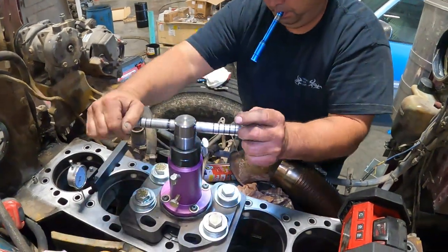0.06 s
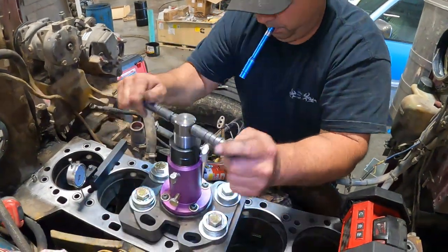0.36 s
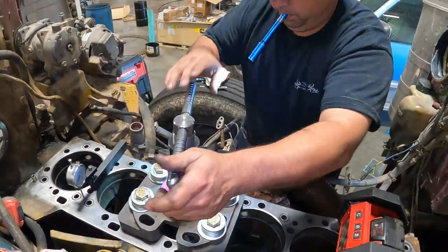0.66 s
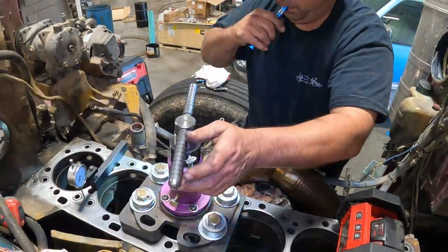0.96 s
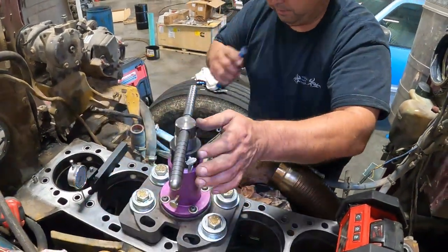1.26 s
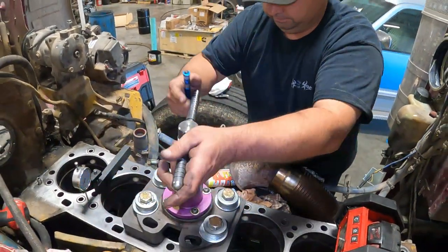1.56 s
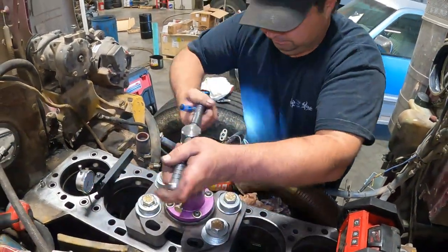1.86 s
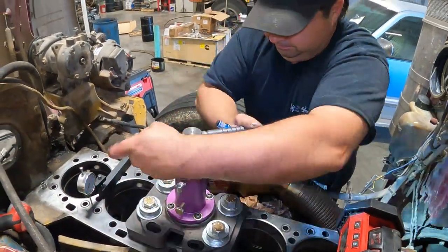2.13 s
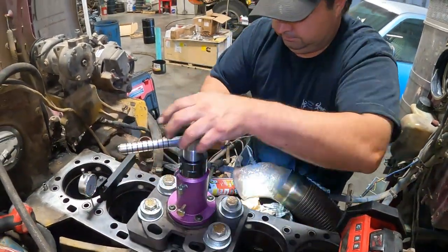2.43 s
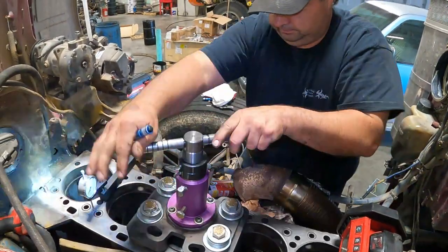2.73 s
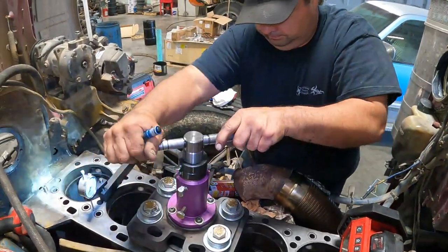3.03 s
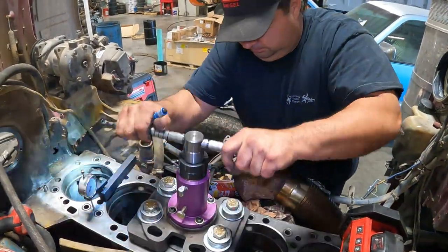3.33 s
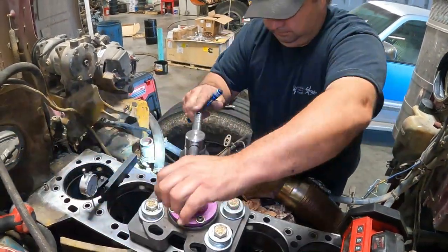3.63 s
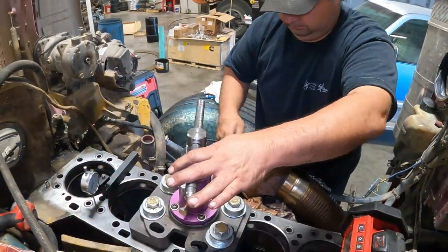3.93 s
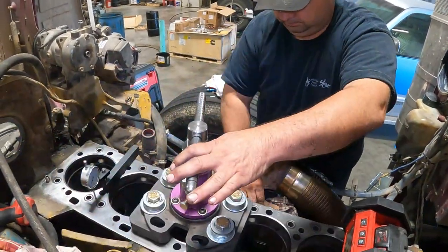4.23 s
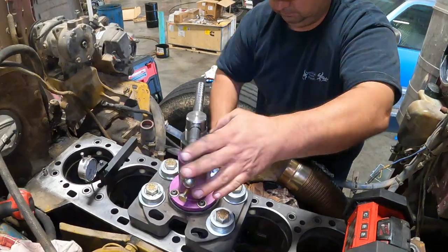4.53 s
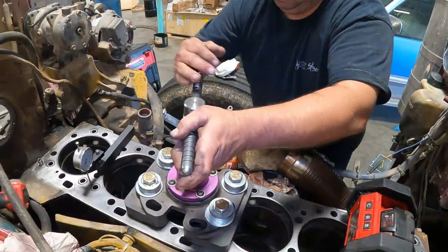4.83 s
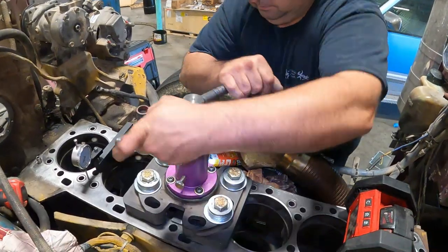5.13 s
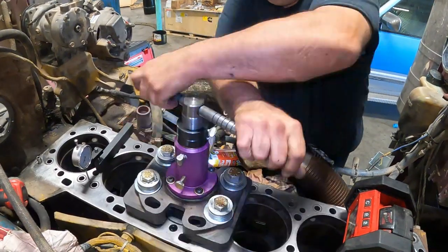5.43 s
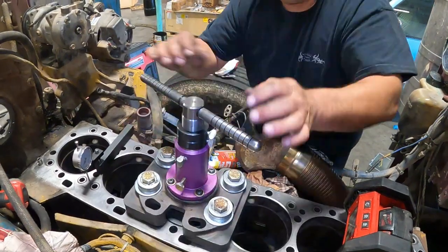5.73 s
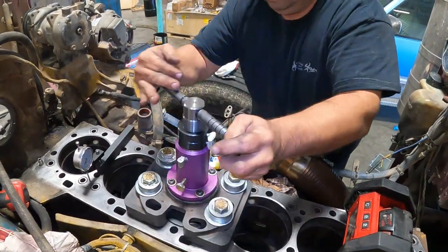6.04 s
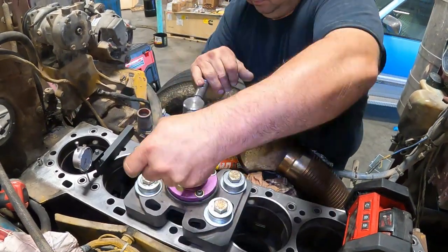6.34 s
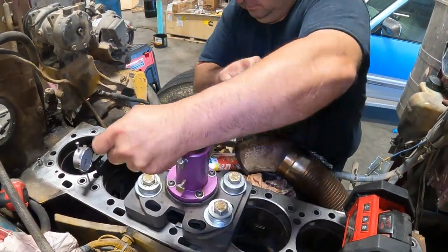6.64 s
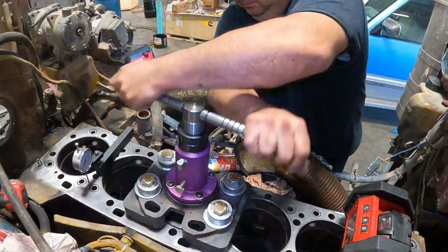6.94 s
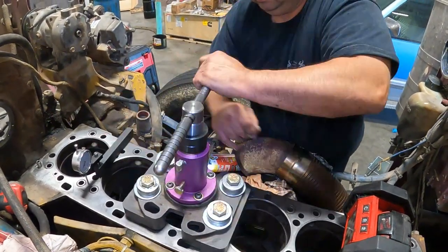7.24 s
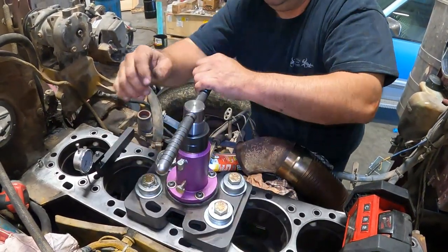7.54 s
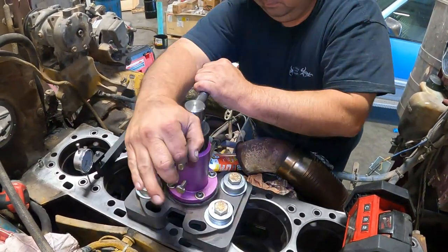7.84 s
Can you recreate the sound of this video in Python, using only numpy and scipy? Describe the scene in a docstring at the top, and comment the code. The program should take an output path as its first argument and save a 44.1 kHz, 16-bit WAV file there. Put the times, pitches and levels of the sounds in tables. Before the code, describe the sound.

In a workshop, a cutter turned by hand scrapes inside an iron engine block, each short stroke a gritty, ringing rasp. Between the first four strokes the tool knocks, hands bump and the sliding steel handle clacks sharply. Three more strokes follow close together, then a few last knocks. The microphone is close, picking up small ticks and rustling clothes over a distant machine's low hum.

```python
"""A workshop, a phone microphone close to an iron engine block. Over the low hum of a distant machine,
clothes rustle and something small ticks. A counterbore cutter is turned by hand: its blade crumbles
a chip and the block rings with a rasp. Between the first four strokes the tool knocks, hands bump
and the sliding T-handle clacks, steel on steel. From about 6 s three more strokes come close
together, and a few last knocks leave the hum on its own."""
import sys
import numpy as np
from scipy import signal
from scipy.fft import rfft, irfft, next_fast_len
from scipy.io import wavfile
from scipy.ndimage import map_coordinates

SR = 44100
rng = np.random.default_rng(int(sys.argv[2]) if len(sys.argv) > 2 else 0)


def waveform_to_disk(signal):
    """Save audio, clipped to [-1, 1], as 16-bit WAV at the path in sys.argv[1]."""
    frames = np.transpose(np.atleast_2d(signal))
    scaled = np.clip(frames, -1, 1) * 32767
    samples = np.round(scaled).astype(np.int16)
    wavfile.write(sys.argv[1], SR, samples)


N = 352359

# Levels in the tables are relative; each source sets its own trim.
# room tone of the shop: freq_hz, level_db
AIR_SPECTRUM = [(15, -43), (25, -18), (48, -19.5), (82, -11), (122, -5), (164, -9.5), (213, -5),
                (278, -6.5), (382, -6.5), (599, -11), (991, -19), (1070, -13.5), (14000, -43)]
# hum of the distant machine: time_s, pitch_hz
MACHINE_PITCH = [(0.0, 53.88), (0.87, 54.83), (1.02, 57.1), (4.12, 66.62), (7.28, 62.72), (7.56, 62.1),
                 (7.99, 54.0)]
# its loudness: time_s, level_db
MACHINE_LEVEL = [(0.06, -60), (0.46, -64.5), (0.5, -77), (0.72, -54.5), (1.08, -66), (1.19, -58.5),
                 (2.62, -64), (2.75, -80.5), (3.13, -51.5), (3.24, -55.5), (4.23, -52), (4.79, -63.5),
                 (5.25, -55.5), (6.16, -72.5), (6.22, -57), (7.3, -57.5), (7.41, -68), (7.99, -74.5)]
# sleeves and palms moving: start_s, length_s, rub_db, swish_db
SLEEVE_MOVES = [(-0.04, 0.54, -51, -59.5), (1.03, 0.674, -55, -66.5), (1.58, 0.485, -47, -48.5),
                (2.26, 0.35, -48, -48), (2.56, 0.32, -57.5, -57.5), (2.93, 0.258, -54.5, -46),
                (3.66, 0.82, -47, -57), (4.3, 0.344, -47, -49.5), (4.6, 0.375, -53.5, -61),
                (4.84, 0.524, -45, -48)]
# low rub of cloth: freq_hz, level_db
RUB_SPECTRUM = [(40, -38.5), (90, -5), (150, -5), (270, -4.5), (380, 2.5), (480, -6), (800, -7),
                (1500, -13), (3000, -14.5), (8000, -70)]
# bright swish of cloth: freq_hz, level_db
SWISH_SPECTRUM = [(500, -31.5), (1400, -3), (2200, -3), (3200, 4), (3800, 0.5), (4600, -1.5), (7000, -15.5),
                  (10000, -27), (14000, -23.5)]
# a hand sliding: start_s, rise_s, level_db, t60_s
HAND_SCUFFS = [(2.306, 0.025, -48, 1.13), (4.305, 0.0632, -31.5, .41)]
# colour of that scuff: freq_hz, level_db
SCUFF_SPECTRUM = [(100, -7.5), (600, -0.5), (2200, -4.5), (4500, -3), (7000, -13), (10000, -12.5),
                  (14000, -33)]
# small dry ticks: start_s, level_db, rebound_count
DRY_TICKS = [(0.032, -34.5, 1), (0.0722, -39, 0), (0.1305, -32.5, 0), (0.1883, -33.5, 0), (0.2474, -33, 0),
             (0.311, -32.5, 0), (0.3783, -31, 0), (0.4664, -37.5, 0), (1.272, -31, 0), (1.4299, -30.5, 0),
             (1.485, -32, 0), (1.5381, -32, 0), (1.5954, -30.5, 0), (1.8043, -31, 1), (2.7644, -32.5, 1),
             (3.9965, -32.5, 1), (4.0312, -32, 2), (4.0771, -32.5, 1), (4.142, -32.5, 2), (4.228, -32.5, 1),
             (6.765, -33, 0)]
# colour of a tick: freq_hz, level_db
TICK_SPECTRUM = [(300, -16), (1000, 7), (2500, -3.5), (5000, 2), (8000, -13), (11000, -11.5),
                 (15000, -20.5)]
# strokes of the cutter: start_s, attack_s, hold_s, release_s, bite_db, end_db (level as the hold
# begins and ends), judder_db, end_judder_db (likewise), hollow_db, hiss_db, stall_db (extra judder)
CUTTER_STROKES = [ (0.261, 0.06625, 0.2547, 0.113, -39, -21, -6.5, -17.5, -1, -9.5, 20.5),
                  (1.982, 0.0258, 0.2033, 0.0692, -32, -30, -13.5, -9, -2, -9, 4),
                  (3.287, 0.0795, 0.2326, 0.0892, -29.5, -22.5, -4, -4, -1.5, -8, 2),
                  (5.1, 0.0228, 0.4224, 0.0603, -28.5, -28, -5, -11.5, 0, -8, 2.5),
                  (6.113, 0.0398, 0.1426, 0.055, -33, -26, -11, -8, -4, -9.5, 13),
                  (6.572, 0.0308, 0.07155, 0.0545, -35.5, -29.5, -10.5, -4.5, 1.5, -8, 6.5),
                  (6.747, 0.0609, 0.475, 0.0708, -30, -34.5, -6, -4, -2, -7.5, 3.5), ]
# borders of the block's five bands (thud, judder, hollow ring, bite, hiss): freq_hz
BAND_EDGES_HZ = [520, 950, 1750, 3600]
# how each band grows with blade speed: exponent
SPEED_EXPONENTS = [0.6, 0.802, 1.1, 1.4, 2.0]
# how each band grows with the push: slope_db_per_db
PUSH_SLOPES = [0.349, 0.6, 0.85, 1.0, 1.22]
# the crumbling chip: freq_hz, level_db
CHIP_SPECTRUM = [(130, -22.5), (280, -26), (450, -19), (1100, -14.5), (2400, -12), (3800, -15), (5500, -26),
                 (7500, -32.5), (10000, -39), (14000, -55)]
# resonances of the block and clamped tool: pitch_hz, width_hz (45 at least is used), lift_db
BLOCK_MODES = [(383.6, 80, 19), (531, 76, 7.5), (647, 31, 13.5), (768.6, 52, 13.5), (839, 8.3, 14.5),
               (988, 23, 5.5), (1081.1, 27, 12), (1260, 56, 11.5), (1357.8, 41, 16.5), (1485, 20, 10.5),
               (1676, 26, 6.5), (1720, 49, 0), (1880.7, 48, 8.5), (2221, 163.6, 17), (2424, 63, 14),
               (2520.4, 35, 9.5), (2640, 66, 3.5), (2752.4, 49, 12.5), (3000, 22, 0.5), (3179, 164, 8),
               (3480, 60, 5.5), (3718, 100, 7.5), (4355, 18, -11), (5763, 150, 3), (6290, 217, -1.5),
               (7280, 196, -20)]
# the tool takes up its slack: start_s, level_db, low_db, high_db, t60_s
TOOL_KNOCKS = [(1.098, -48, 11, -24.5, 0.08), (1.118, -41.5, -0.5, -15, 0.05),
               (1.579, -30.5, -13.5, -2.5, 0.0545), (3.842, -41, 2, -28.5, 0.054),
               (3.878, -27.5, 1, -6, 0.0687), (4.406, -28, -7.5, -18.5, 0.062),
               (6.022, -17.5, -9, -9, 0.0894), (6.429, -19, -18, -24.5, 0.00545),
               (7.218, -22, 2.5, -13, 0.11), (7.691, -28, 0.5, -9, 0.097), (7.703, -36.5, 7, -19.5, 0.166)]
# dull bumps of hands and arms: start_s, level_db, pitch_hz, t60_s
HAND_BUMPS = [(1.169, -48, 142.4, 0.67), (1.36, -48, 150.5, 0.505), (2.236, -39, 221.4, 0.178),
              (2.275, -38.5, 153.9, 0.212), (2.373, -23.5, 173, 0.041), (2.438, -49.5, 157.5, 0.68),
              (2.491, -33.5, 254.9, 0.28), (3.779, -34.5, 322.8, 0.081), (3.882, -27, 360.3, 0.0563),
              (3.965, -44, 145.6, 0.75), (4.691, -40.5, 196.7, 0.172), (4.881, -36.5, 189.4, 0.116),
              (6.024, -34.5, 308, 0.194), (7.217, -33.5, 147.3, 0.095), (7.697, -31, 336, 0.1)]
# clacks of the T-handle: start_s, level_db, knock_db (into the block), hardness_db (treble lift)
HANDLE_CLACKS = [(1.728, -7.5, -16.5, 0), (1.7834, -24.5, -9.5, -8), (2.8816, -11.5, -8.5, 3),
                 (2.8839, -7, -25.5, -13), (4.366, -11.5, -28.5, 17), (4.4479, -23.5, -14.5, 0.5)]
# resonances of the handle: pitch_hz, width_hz (280 at least is used), level_db
STEEL_MODES = [(2400, 440, -4), (3370, 250, -7.5), (3840, 170, 3), (4500, 250, 5), (4930, 300, 1.5),
               (5260, 350, -2.5), (6984, 530, -8)]
# steel striking steel: freq_hz, level_db
STRIKE_SPECTRUM = [(100, -19), (900, -7), (5500, -2), (6300, -4.5), (9000, -10.5), (14000, -16.5)]
# diffuse wake of a clack: freq_hz, level_db
WAKE_SPECTRUM = [(300, -8.5), (1400, -5), (2200, -13.5), (3300, 4), (4500, 3.5), (5800, -4.5), (7500, -19),
                 (12000, -36)]
# faint notes of rubbed steel: start_s, length_s, pitch_hz, width_hz, level_db
STEEL_WHISPERS = [(1.76, 0.188, 4160, 700, -58.5), (2.329, 0.336, 4453, 130, -60),
                  (2.32, 0.364, 6450, 1800, -65.5), (3.02, 0.1, 3150, 281, -49.5),
                  (3.294, 0.299, 5780, 70, -56), (4.073, 0.247, 657, 60.6, -53.5),
                  (4.093, 0.35, 3530, 600, -58.5), (4.846, 0.31, 2986, 489, -61.5)]
# decay of the hall: freq_hz, t60_s
HALL_DECAY = [(150, 0.6), (1000, 0.654), (4000, 0.707), (12000, 0.49)]
# colour of its tail: freq_hz, level_db
HALL_SPECTRUM = [(200, -2), (700, 8), (1500, -0.5), (3000, -1), (6000, 2), (12000, -11)]
# response of the microphone port: freq_hz, gain_db
MIC_RESPONSE = [(20, -2.5), (40, 2), (7500, 0), (8750, -8), (9050, -16), (9400, -5), (10000, -3),
                (10700, 4), (11150, -2), (11700, -10), (13400, -3), (14200, -15.5), (16000, -13)]
# slight stereo widening of the high treble: freq_hz, phase_db (re 1 radian, opposite in left and right)
TREBLE_SPREAD = [(1500, -68.5), (2800, -61), (5000, -34), (8000, -21.5), (11000, -17), (13000, -4)]

MOVE_RISE_S, MOVE_FALL_S = 0.045, 0.062  # fades of a rubbing movement


def amp(db):
    """Decibels to gain."""
    return 10 ** (np.asarray(db) / 20)


def unit(x):
    """Scale to rms 1."""
    return x / np.sqrt(np.mean(x ** 2) + 1e-20)


def along(points, hz):
    """Read (freq_hz, value) points on a log axis."""
    freqs, values = np.transpose(points)
    return np.interp(np.log(hz + 1), np.log(freqs + 1), values)


def shape(points):
    """Gain as a function of frequency, from (freq_hz, level_db) points."""
    return lambda hz: amp(along(points, hz))


def wobble(rate, size):
    """A smooth random curve, rate knots a second."""
    knots = rng.standard_normal(int(size * rate / SR) + 4)
    fine = np.arange(0, len(knots) - 1, 1 / 8)
    return np.interp(np.arange(size) * rate / SR, fine, map_coordinates(knots, [fine]))


def colour(x, gain):
    """Minimum-phase filter with the given gain curve; white noise keeps its power."""
    size = 8192
    log_gain = np.log(np.maximum(unit(gain(np.fft.rfftfreq(size, 1 / SR))), 1e-6))
    cepstrum = irfft(log_gain, size)
    cepstrum[1:size // 2] *= 2
    cepstrum[size // 2 + 1:] = 0
    return signal.oaconvolve(x, irfft(np.exp(rfft(cepstrum)), size))[:len(x)]


def resonance(hz, pitch_hz, width_hz):
    """A peak of height 1, width_hz wide at half height."""
    return 1 / (1 + (2 * (hz - pitch_hz) / width_hz) ** 2)


def add(track, start_s, sound):
    """Mix a sound into the track."""
    part = track[max(round(start_s * SR), 0):][:len(sound)]
    part += sound[:len(part)]


def swell(length, rise, fall):
    """Time axis and an envelope that rises, holds at 1 and falls to 0."""
    t = np.arange(int(length * SR)) / SR
    return t, np.clip(np.minimum(t / rise, (length - t) / fall), 0, 1)


def burst(t60):
    """A dying shower of micro-impacts."""
    t = np.arange(SR // 3) / SR
    return rng.choice([-1., 1.], len(t)) * amp(-60 * t / t60)


def room_tone(air_db=-54, hum_trim_db=-1):
    """Shop air and the wavering hum of a distant machine."""
    t = np.arange(N) / SR
    pitch_hz = np.interp(t, *np.transpose(MACHINE_PITCH)) + 1.2 * wobble(11, N)
    hum_db = np.interp(t, *np.transpose(MACHINE_LEVEL)) + hum_trim_db + 1.7 * wobble(10, N)
    hum = amp(hum_db) * np.sqrt(2) * np.sin(2 * np.pi * np.cumsum(pitch_hz) / SR)
    air_gain = amp(air_db + 0.45 * wobble(9.9, N))
    return hum + air_gain * unit(colour(rng.standard_normal(N), shape(AIR_SPECTRUM)))


def friction(spectrum, size, flutter_db, rate):
    """Rubbing noise of rms 1 that catches unevenly."""
    return unit(colour(rng.standard_normal(size), shape(spectrum)) * amp(flutter_db * wobble(rate, size)))


def sleeves_and_palms(rub_trim_db=-3.0, swish_trim_db=-7.5, sag_db_per_s=2.5):
    """Cloth rubs and swishes, starting briskly and flagging; a sliding hand's scuff dies away."""
    out = np.zeros(N)
    for start, length, rub_db, swish_db in SLEEVE_MOVES:
        t, motion = swell(length, MOVE_RISE_S, MOVE_FALL_S)
        rub = amp(rub_db + rub_trim_db) * friction(RUB_SPECTRUM, len(t), flutter_db=3.09, rate=45)
        swish = amp(swish_db + swish_trim_db) * friction(SWISH_SPECTRUM, len(t), flutter_db=2.24, rate=71)
        add(out, start, motion * amp(-sag_db_per_s * t) * (rub + swish))
    for start, rise, level_db, t60 in HAND_SCUFFS:
        t, motion = swell(t60, rise, MOVE_FALL_S)
        scuff = friction(SCUFF_SPECTRUM, len(t), flutter_db=1.0, rate=310)
        add(out, start, motion * amp(level_db - 60 * np.maximum(t - rise, 0) / t60) * scuff)
    return out


def ticks(tail_db=-13, rebound_s=0.0063, rebound_loss_db=5):
    """Tiny dry snaps in short runs; some rebound at once."""
    out = np.zeros(N)
    for start, level_db, rebounds in DRY_TICKS:
        for k in range(round(rebounds) + 1):
            snap = colour(burst(t60=0.004) + amp(tail_db) * burst(t60=0.04), shape(TICK_SPECTRUM))
            add(out, start + k * rebound_s, amp(level_db + 1 - k * rebound_loss_db) * snap)
    return out


def crumble(size, fractures_per_s=16000, slip_db=0.1668, slip_rate=70, grit_db=0.82, grit_rate=400):
    """Iron breaks off in tiny fractures while the blade grabs and slips."""
    cracks = (rng.random(size) < fractures_per_s / SR) * rng.standard_normal(size)
    return unit(cracks * amp(slip_db * wobble(slip_rate, size) + grit_db * wobble(grit_rate, size)))


def engine_block(force, band_gains, vary_db):
    """The block rings under a force; mode strengths are drawn afresh for each place of the blade."""
    grid = np.arange(0, SR / 2, 5)
    lift = sum(amp(db + vary_db * rng.standard_normal()) ** 2 * resonance(grid, pitch, max(width, 45))
               for pitch, width, db in BLOCK_MODES)
    body = shape(CHIP_SPECTRUM)(grid) * np.sqrt(1 + lift)
    body *= shape([(50, -18), (130, 0)])(grid)  # a stiff casting radiates little bass
    ring = colour(force, lambda hz: np.interp(hz, grid, body))
    lowpasses = [1 / (1 + (grid / edge) ** 12) for edge in BAND_EDGES_HZ]
    band_masks = np.diff([np.zeros_like(grid), *lowpasses, np.ones_like(grid)], axis=0)
    size = next_fast_len(len(force) + 2048)
    spectrum, hz = rfft(ring, size), np.fft.rfftfreq(size, 1 / SR)
    out = np.zeros(len(force))
    for gain, mask in zip(band_gains, band_masks):
        band = irfft(spectrum * np.interp(hz, grid, mask), size)[:len(force)]
        equal_power = np.linalg.norm(body) / np.linalg.norm(body * mask)
        out += gain * equal_power * band
    return out


def cutter(usual_db=-34, arch_db=1.23, uneven_db=0.7342, catch_db=-0.16, stall_at=0.578, stall_s=0.028):
    """Each stroke speeds up, cuts and stalls with a judder; faster and firmer is brighter."""
    out = np.zeros(N)
    for (start, attack, hold, release, bite_db, end_db,
         judder_db, end_judder_db, hollow_db, hiss_db, stall_db) in CUTTER_STROKES:
        t, speed = swell(attack + hold + release, attack, release)
        progress = np.clip((t - attack) / hold, 0, 1)
        push_db = bite_db + (end_db - bite_db) * progress
        push_db += arch_db * np.sin(np.pi * progress)  # extra push midway
        push_db += uneven_db * wobble(30, len(t))  # unsteady feed
        stall = np.exp(-((t - attack - hold - stall_at * release) / stall_s) ** 2)
        shake_db = judder_db + (end_judder_db - judder_db) * progress + stall_db * stall
        thud_db = -13 + 0.16 * shake_db  # the heavy casting follows the judder only partly
        bands_db = [thud_db, shake_db - 4, hollow_db - 1, -2, hiss_db - 2]
        gains = []
        for exponent, slope, band_db in zip(SPEED_EXPONENTS, PUSH_SLOPES, bands_db):
            flare_db = catch_db * wobble(26, len(t))  # each band flares as the blade catches
            level_db = usual_db + slope * (push_db - usual_db) + band_db + flare_db
            gains.append(speed ** exponent * amp(level_db))
        # the ring changes colour as the blade travels round the bore
        first, last = [engine_block(crumble(len(t)), gains, vary_db=2.5) for _ in range(2)]
        travel = np.linspace(0, np.pi / 2, len(t))
        add(out, start, np.cos(travel) * first + np.sin(travel) * last)
    return out


def tool_knocks(trim_db=-5.5, thud_db=-6, hollow_db=-3, bite_db=-3):
    """The tool jolts against the block as the hands take or leave the handle."""
    out = np.zeros(N)
    for start, level_db, low_db, high_db, t60 in TOOL_KNOCKS:
        gains = amp([low_db + thud_db, low_db, hollow_db, bite_db, high_db])
        add(out, start, amp(level_db + trim_db) * engine_block(burst(t60), gains, vary_db=5.5))
    return out


def hand_bumps(rise_s=0.01):
    """Each soft contact swells into a single unsteady low resonance."""
    out, t = np.zeros(N), np.arange(SR // 2) / SR
    for start, level_db, pitch_hz, t60 in HAND_BUMPS:
        envelope = (1 - np.exp(-t / rise_s)) * amp(level_db + 3 - 60 * t / t60)
        ring = np.sin(2 * np.pi * pitch_hz * t + 0.55 * wobble(70, len(t)))
        add(out, start, envelope * ring)
    return out


def handle_clacks(ring_db=-17, wake_db=-30, treble_hz=6200):
    """Steel hits steel: a crack, a ring damped by the hand, a knock in the block and a diffuse wake."""
    out = np.zeros(N)
    for start, level_db, knock_db, hardness_db in HANDLE_CLACKS:
        def steel(hz):
            modes = sum(amp(db) ** 2 * resonance(hz, pitch, max(width, 280))
                        for pitch, width, db in STEEL_MODES)
            treble = 1 / (1 + np.exp((treble_hz - hz) / 300))
            return np.sqrt(modes) * amp(hardness_db * treble + along(STRIKE_SPECTRUM, hz))
        strike = colour(burst(t60=0.02) + amp(ring_db) * burst(t60=0.077), steel)
        knock = engine_block(burst(t60=0.15), amp([-14.5, -14, -8, -22.5, -13]), vary_db=4.0)
        wake = colour(burst(t60=0.35), shape(WAKE_SPECTRUM))
        add(out, start, amp(level_db) * (strike + amp(knock_db) * knock + amp(wake_db) * wake))
    return out


def rubbed_steel():
    """Light rubbing sings faintly in one narrow resonance of the steel."""
    out = np.zeros(N)
    for start, length, pitch_hz, width_hz, level_db in STEEL_WHISPERS:
        t, motion = swell(length, MOVE_RISE_S, MOVE_FALL_S)
        note = colour(rng.standard_normal(len(t)), lambda hz: resonance(hz, pitch_hz, width_hz))
        add(out, start, motion * amp(level_db) * unit(note))
    return out


def shop_echo(x, near_db, far_db):
    """The engine bay close by answers at once, the hall beyond with a faint long tail."""
    hz, t, noise = signal.stft(rng.standard_normal(SR), SR, nperseg=256)
    decay = amp(-60 * t / along(HALL_DECAY, hz)[:, None])
    tail = colour(signal.istft(noise * decay, SR, nperseg=256)[1], shape(HALL_SPECTRUM))
    near = burst(t60=0.057)
    response = np.zeros(SR)
    add(response, 0.003, amp(near_db) * near / np.linalg.norm(near))
    add(response, 0.012, amp(far_db) * tail / np.linalg.norm(tail))
    return signal.fftconvolve(x, response)[:N]


def scene(side_noise_db=-77, hiss_db=-89):
    """Every source sits dead centre, over faint low noise and hiss, different in left and right."""
    rasp = cutter()
    hits = tool_knocks() + handle_clacks() + ticks() + hand_bumps()
    echoes = shop_echo(rasp, near_db=-10, far_db=-26) + shop_echo(hits, near_db=-12, far_db=-23)
    side_noise = np.array([colour(x, shape(AIR_SPECTRUM)) for x in rng.standard_normal((2, N))])
    centre = rasp + hits + echoes + sleeves_and_palms() + rubbed_steel() + room_tone()
    return centre + amp(side_noise_db) * side_noise + amp(hiss_db) * rng.standard_normal((2, N))


def record(dry):
    """The microphone port colours the treble. The high treble sounds slightly wide and ends at top_hz."""
    top_hz = 15600
    size = next_fast_len(N + SR // 2)
    hz = np.fft.rfftfreq(size, 1 / SR)
    port = shape(MIC_RESPONSE)
    port_gain = np.sqrt(np.mean(port(hz) ** 2))
    ported = port_gain * np.array([colour(x, port) for x in dry])
    spread = np.exp(1j * np.outer([1, -1], shape(TREBLE_SPREAD)(hz)))
    return irfft(rfft(ported, size) * spread * (hz < top_hz), size)[:, :N]


dry = scene()
out = record(dry)
waveform_to_disk(out)
```